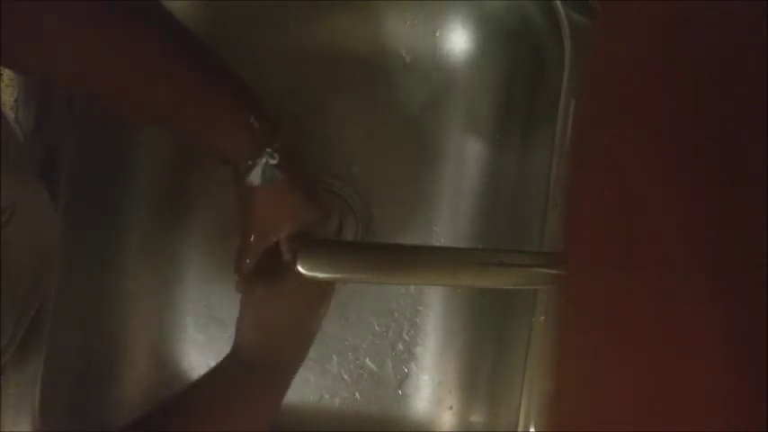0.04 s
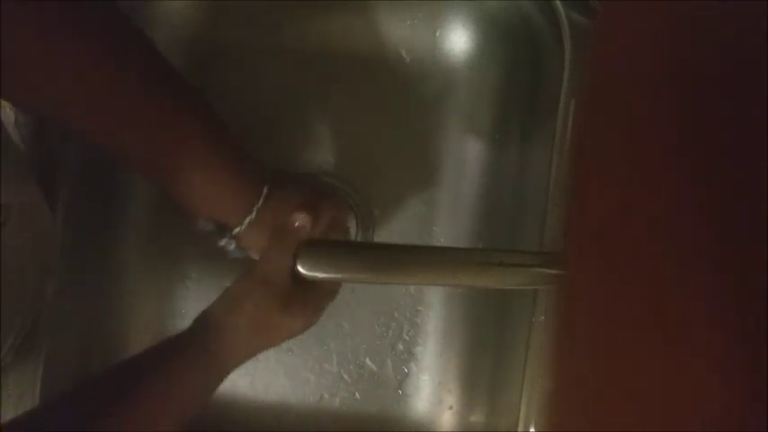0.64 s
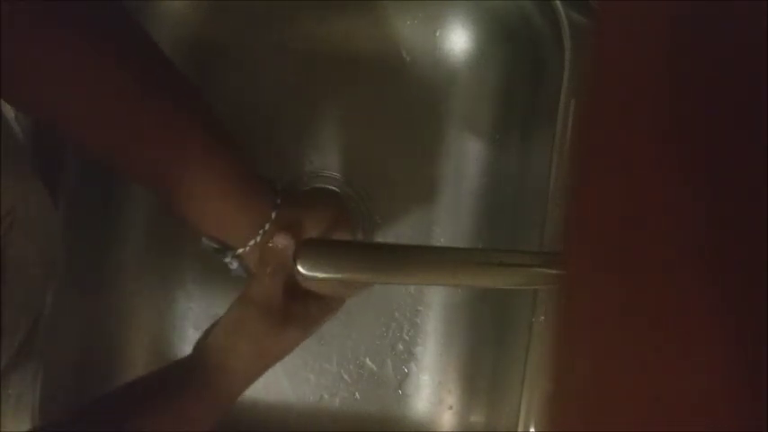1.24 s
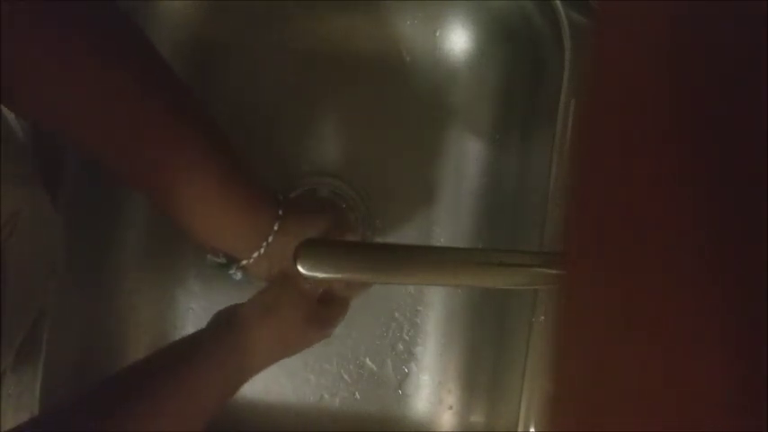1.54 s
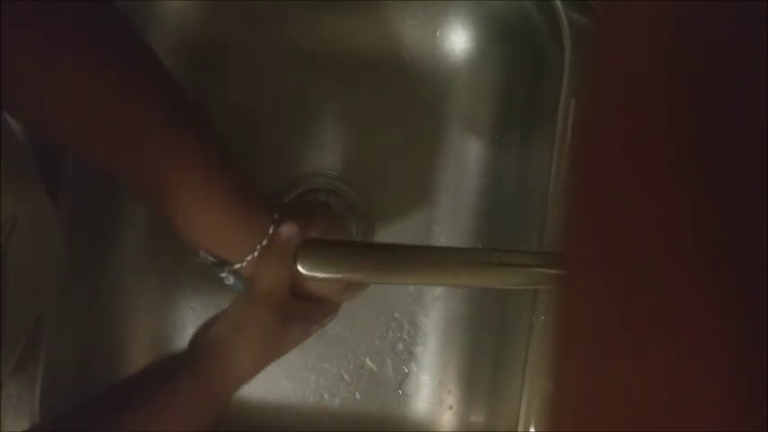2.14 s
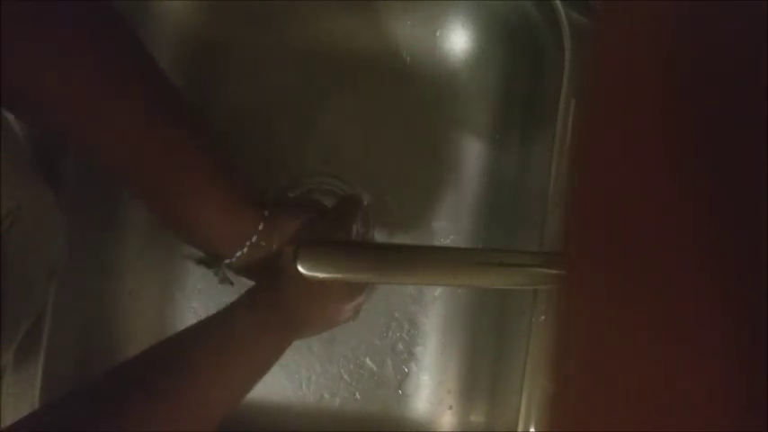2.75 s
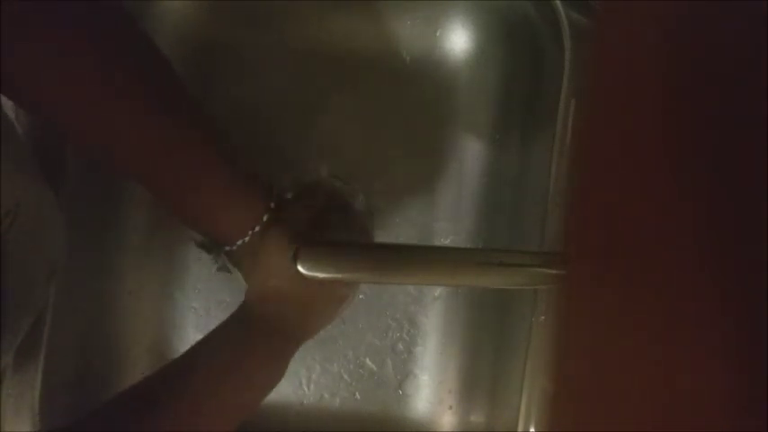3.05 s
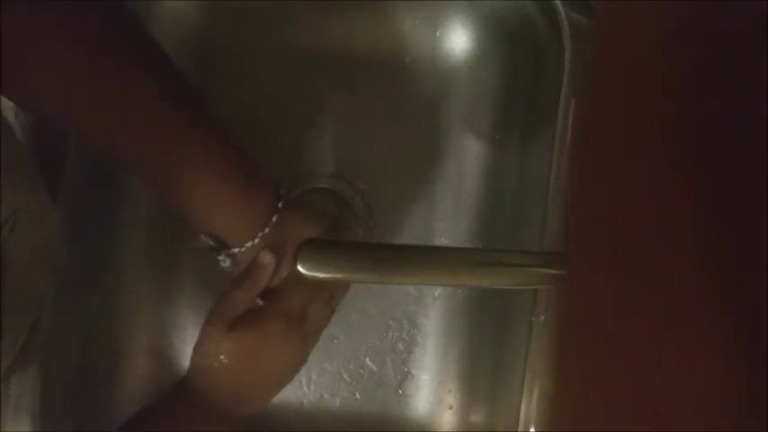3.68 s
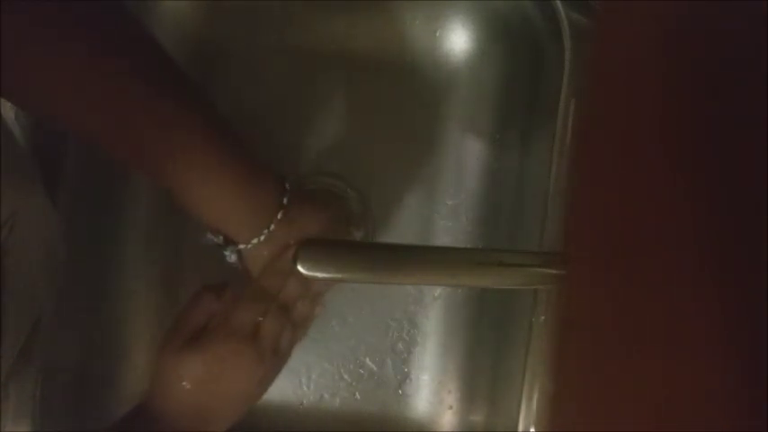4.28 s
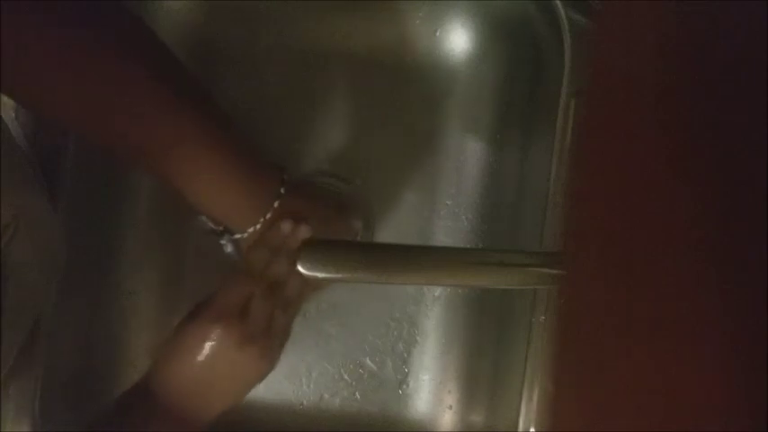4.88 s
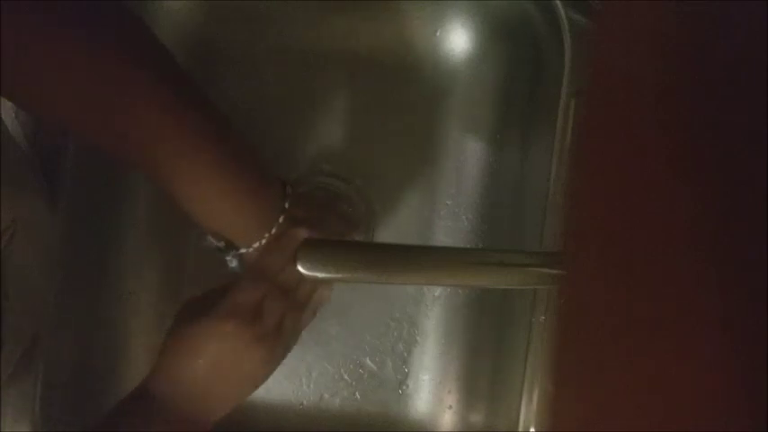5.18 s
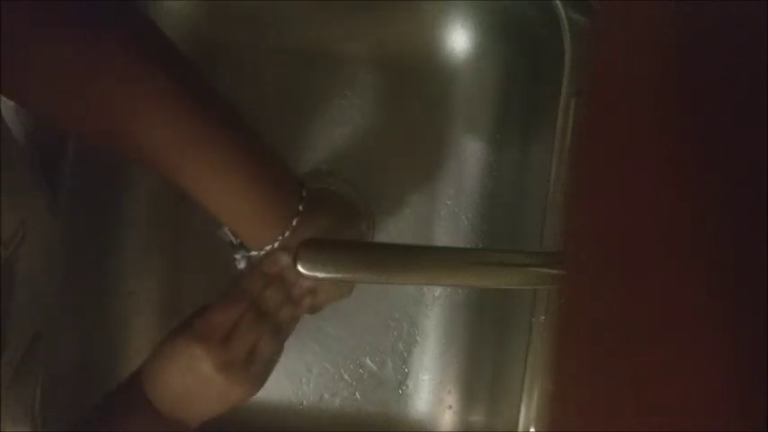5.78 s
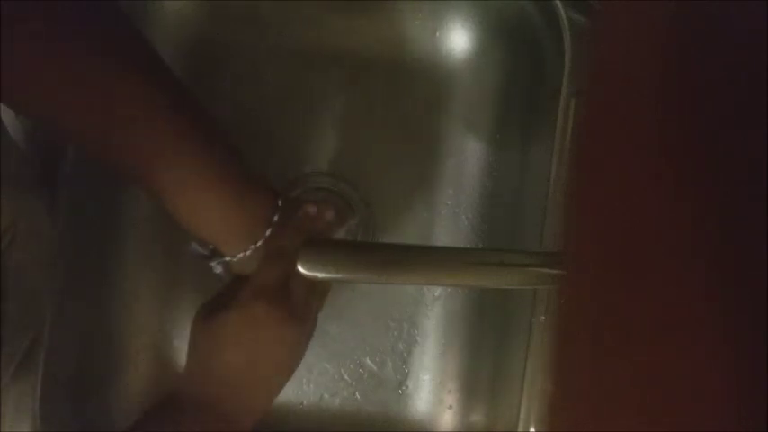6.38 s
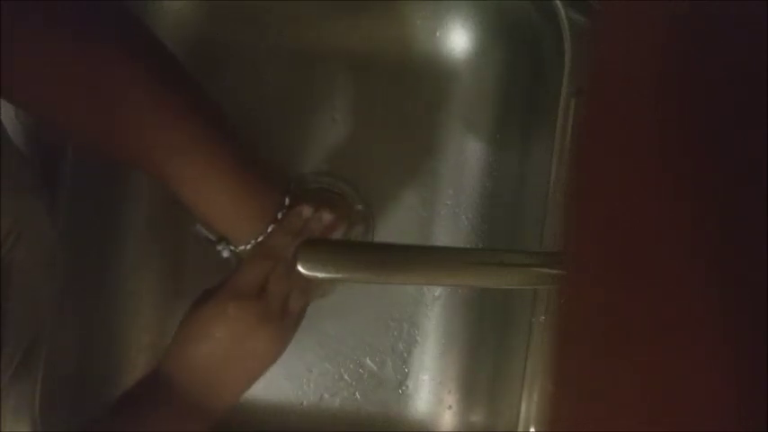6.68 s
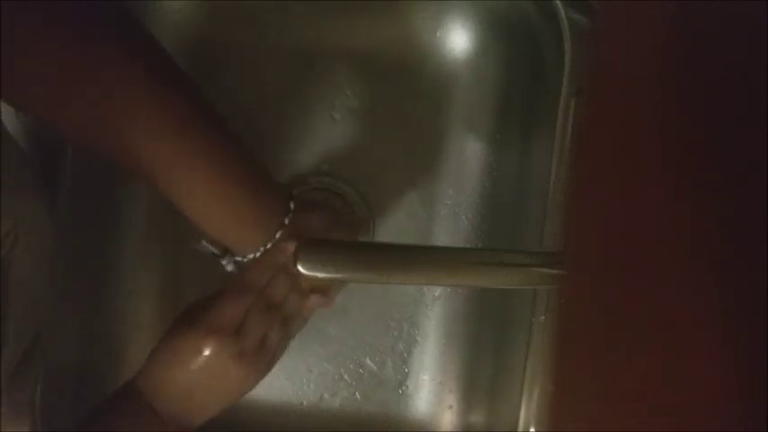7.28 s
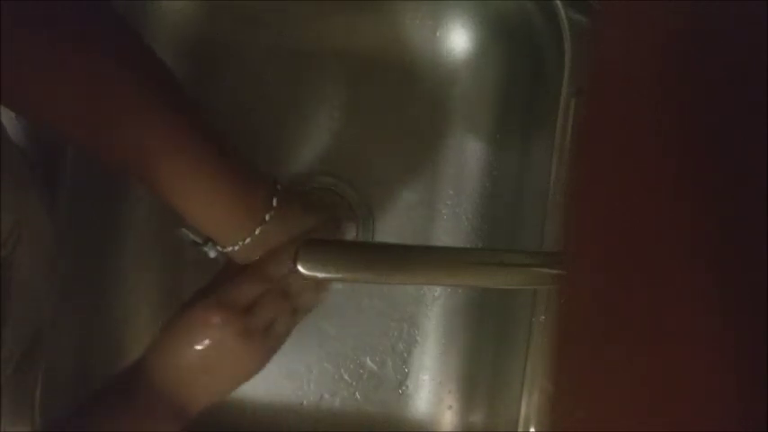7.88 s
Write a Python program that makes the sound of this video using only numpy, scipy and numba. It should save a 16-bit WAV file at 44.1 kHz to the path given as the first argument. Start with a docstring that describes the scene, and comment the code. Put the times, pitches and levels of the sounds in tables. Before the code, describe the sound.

Hands are rubbed and rinsed under a steady stream of tap water, heard close up just above a steel kitchen sink. The water hisses and splashes from start to finish while the palms squish, click and pop unevenly. From about three seconds in, light wet slaps join the rubbing. Heavier slops of water occasionally hit the basin with soft, hollow thuds, over a light gurgle and small pinging drips.

```python
"""Hissing, splashing water, close up: a kitchen faucet runs over two hands into a stainless steel sink.
The jet breaks into tiny bubbles on the skin; the rubbing palms squelch, slap and pop pockets of air.
Below, run-off drums on the sink floor and stray drops ping. The steel walls and the kitchen throw
the splashes back to a pair of microphones just above the basin."""
import sys
import numpy as np
from scipy import signal
from scipy.fft import rfft, irfft
from scipy.io import wavfile
from numba import njit

SR = 44100
rng = np.random.default_rng(int(sys.argv[2]) if len(sys.argv) > 2 else 0)


def to_wav(sig):
    """Store sig (one row per channel, or 1-D mono) as 16-bit WAV at the path in sys.argv[1].

    Samples outside -1..1 are clipped; the rate is SR.
    """
    pcm = np.clip(np.atleast_2d(sig), -1, 1) * 32767
    pcm = np.round(pcm).astype(np.int16)
    wavfile.write(sys.argv[1], SR, pcm.T)  # frames by channels


N = 358533
TIME, FREQ = np.arange(N) / SR, np.arange(N // 2 + 1) * SR / N

# Spectra of the room rumble and of the stream's three voices: (frequency [Hz], relative level [dB])
RUMBLE_SPECTRUM = [(15, 5.5), (35, -20), (70, 4), (150, -9), (400, -21.5), (1000, -38)]
GURGLE_SPECTRUM = [(330, -7.5), (460, -16.5), (570, -7.5), (800, -6.5), (1150, -1.5), (1400, -5.5),
                   (2000, -4)]
HISS_SPECTRUM = [(450, -30), (700, 1), (1500, 1), (2000, 10.5), (4500, 9), (6300, 0.5), (8000, -2),
                 (10000, -6.5), (13000, -6), (16000, -4.5)]
SPLASH_SPECTRUM = [(900, -17), (1450, -17), (1700, -1.5), (2400, -6), (3300, -2), (4100, 1), (5000, -4),
                   (6000, -9), (8000, -17.5), (12000, -20)]
# Resonances of the sink floor, the drain and the basin walls:
# (frequency [Hz], half-width [Hz], relative level [dB], phase lag of the right side [rad])
FLOOR_MODES = [(59, 55, -10.5, -1), (86, 6.3, -3.5, 0.1), (107.5, 13.8, 7, -0.44), (118, 5.1, -15, 0.5),
               (188, 15.1, 0.5, 0.79), (219.6, 7.9, 1, 0.87), (286.6, 29.6, -7.5, 1), (297.4, 7.4, -9, 2.5),
               (324, 13, -7.5, 3.5)]
DRAIN_MODES = [(516.2, 9.9, -2.5, 1.48), (608.6, 29, -8.5, 0.45), (685, 45, -15, 0.45),
               (850, 23, -7.5, 0.87)]
BASIN_MODES = [(1107, 13, 1, 1.25), (1233, 70, 2, 3.08), (1304, 27, -1, 4.2), (1498, 10, 4, 1.66),
               (1665, 47, 5, 2.27), (1773, 87, -7.5, 1.9), (2045, 52, 4, 2.3), (2214, 85, 1, 1.4),
               (2350, 35, 5.5, 1), (2697, 105, 1, 1.23), (3050, 76, 3, 3.34), (3152, 45, 0, 0.62),
               (3876, 120, -1.5, 0.48), (4200, 140, -7.5, 0.75)]
# Run-off landing on the bare steel floor: (time [s], level [dB])
RUNOFF_LEVELS = [(0, -64), (0.55, -64.5), (0.8, -67.5), (1.25, -65.5), (1.8, -66), (2.5, -65), (3.6, -61.5),
                 (3.85, -68), (4.1, -60), (4.45, -67), (4.75, -60.5), (5.35, -65), (5.7, -60.5),
                 (6.3, -64.5), (6.6, -63), (8.13, -62.5)]
# The hands part and water pours onto the drain: (time of peak [s], relative level [dB], length [s])
DRAIN_POURS = [(0.456, -67.5, 0.22), (1.17, -72, .1), (2.166, -67.5, 0.38), (2.884, -60.5, 0.093),
               (3.1, -68.5, 0.52), (4.15, -62.5, 0.28), (5.052, -70, 0.11), (5.9, -60, 0.23),
               (6.486, -67.5, 0.084), (7.948, -72, 0.13)]
# Heavy slops and soft thuds of water on the steel: (time [s], relative level [dB], length [s])
FLOOR_SLOPS = [(0.325, -53, 0.042), (0.46, -54, 0.034), (2.902, -48, 0.071), (3.125, -54, 0.031),
               (4.81, -60, 0.051), (5.07, -71, 0.025), (5.61, -58, .07), (5.79, -53.5, 0.069),
               (5.895, -52.5, 0.078), (7.02, -58, 0.031), (7.67, -60, 0.032), (7.89, -56, 0.073)]
FLOOR_THUDS = [(1.49, -52.5, 0.16), (3.72, -49, 0.074), (4.35, -46, 0.076), (5.33, -49, 0.086),
               (5.9, -49, 0.055), (6.08, -49, 0.067), (6.28, -50, 0.054), (6.5, -50, 0.081),
               (6.98, -49, 0.14)]
# Water squeezed out between the palms: (time [s], relative level [dB], pitch [Hz], length [s])
PALM_SQUELCHES = [(0.294, -49.5, 1950, 0.048), (0.329, -49, 4000, 0.052), (0.402, -48, 3230, 0.032),
                  (0.43, -49, 3260, 0.034), (0.502, -39, 4120, 0.023), (0.528, -40, 3800, 0.026),
                  (0.566, -41, 4400, 0.013), (0.586, -41, 3110, .033), (1.069, -46, 4400, 0.032),
                  (1.09, -56, 1156, 0.051), (1.325, -49.5, 4770, 0.04), (1.803, -46, 4020, 0.02),
                  (2.094, -50, 3480, .018), (2.305, -46.5, 3100, 0.024), (2.65, -41, 4300, 0.0082),
                  (2.661, -44.5, 2830, 0.021), (2.855, -45.5, 3170, .03), (2.919, -45, 2470, 0.023),
                  (3.002, -42.5, 4800, 0.025), (3.155, -45, 4140, 0.03), (3.387, -41.5, 4400, .01),
                  (3.453, -44.5, 3040, 0.031), (3.727, -40, 2070, 0.02), (3.73, -37, 4420, .015),
                  (3.784, -45, 2450, 0.017), (3.935, -42, 4000, .02), (3.938, -46, 2520, 0.029),
                  (4.018, -49.5, 6600, 0.026), (4.284, -40, 3730, 0.024), (4.454, -58, 1100, 0.041),
                  (4.632, -48, 2000, 0.031), (5.227, -43, 4020, 0.027), (5.332, -43, 4100, 0.026),
                  (5.696, -42, 3150, 0.031), (5.871, -46, 6340, 0.015), (5.899, -49, 1910, 0.018),
                  (5.995, -48, 4370, 0.03), (6.056, -46, 2090, .016), (6.109, -45, 5800, 0.016),
                  (6.256, -47, 3750, 0.034), (6.311, -46, 4820, 0.033), (6.438, -48, 7400, 0.014),
                  (6.742, -46, 2150, 0.017), (7.048, -45, 5200, 0.0081), (7.102, -52, 2800, 0.013),
                  (7.197, -42, 4180, 0.016), (7.289, -39.5, 2240, 0.0068), (7.315, -42.5, 2780, 0.019),
                  (7.68, -50, 3130, 0.02), (7.726, -49, 1770, 0.018), (7.72, -44, 2900, .014),
                  (8.079, -46, 5200, 0.022)]
# Wet palms clapping shut: (time [s], relative level [dB], middle pitch [Hz], length [s])
PALM_SLAPS = [(2.91, -41.5, 4700, 0.017), (3.602, -43.5, 3130, 0.031), (3.728, -38.5, 4440, .011),
              (4.165, -45, 2670, 0.013), (4.273, -44, 5200, .006), (4.287, -51, 3500, 0.013),
              (5.357, -44.5, 3000, 0.013), (5.689, -41, 3800, 0.018), (6.052, -40.5, 3330, .013),
              (6.324, -47, 3160, 0.033), (6.382, -38, 3330, 0.01), (6.449, -46, 3600, .006),
              (7.067, -38, 3450, .012), (7.294, -37, 3900, 0.0098), (7.795, -45, 2930, 0.0075)]
# Air pockets bursting between the fingers; a short ring is a tick, a long one a plip:
# (time [s], relative level [dB], pitch [Hz], ring [cycles])
FINGER_POPS = [(0.5215, -27, 4100, 4.3), (0.589, -29, 3060, 9), (0.607, -32, 2890, 7.6),
               (1.072, -34, 3900, 11), (1.092, -37, 3900, 12), (1.118, -33, 3760, 12),
               (1.1425, -31, 3860, 8.5), (1.2523, -32, 2220, 5.7), (1.7355, -34, 4340, 6),
               (1.789, -32, 3875, 11), (1.846, -34, 3920, 9), (1.889, -32, 4100, 5), (1.964, -35, 3900, 7),
               (1.999, -38, 2660, 8.8), (2.044, -36, 2660, 7.3), (2.087, -32, 3770, 12),
               (2.093, -31.5, 2710, 8), (2.279, -33, 3790, 8), (2.452, -25, 3900, 6.6),
               (2.6398, -31, 4300, 3), (2.9438, -29, 2185, 6.5), (2.9788, -20, 4090, 3.8),
               (3.4362, -26.5, 4320, 2.1), (4.0268, -29, 4070, 6.6), (4.17, -30.5, 3820, 5.4),
               (4.2747, -26, 3980, 5), (4.2882, -25, 3300, 6.7), (4.519, -33, 4640, 7),
               (4.562, -29, 3910, 5.5), (4.6224, -29.5, 2070, 4.4), (4.638, -30, 4500, 4),
               (4.7535, -29, 3800, 6), (4.8422, -28.5, 3830, 6), (5.001, -30, 3750, 9.3),
               (5.223, -30.5, 3790, 6), (5.349, -22, 3700, 8.7), (5.434, -38, 3900, 5),
               (5.662, -27, 3460, 4.5), (5.9592, -21.5, 4150, 7.7), (6.033, -33, 4770, 5),
               (6.0754, -24.5, 4530, 5), (6.1115, -22.5, 5900, 3), (6.343, -29, 4670, 3),
               (6.4277, -25, 5560, 3), (7.141, -26, 3930, 6), (7.181, -28, 4900, 3.5),
               (7.293, -26.5, 4000, 6.5), (7.571, -34.5, 2690, 5.5), (7.592, -30, 4200, 6),
               (7.695, -34, 3240, 5), (7.722, -37, 1615, 6), (7.7977, -28, 3660, 6.4),
               (8.027, -30, 5030, 3.1)]
# Water gulping in the cupped palms: (time [s], level [dB], length [s], pitch of the hollow [Hz])
PALM_GULPS = [(1.057, -57, 0.035, 1120), (1.887, -59, 0.11, 1300), (2.279, -56, 0.033, 1300),
              (3.208, -50, 0.053, 780), (3.404, -55, 0.045, 1000), (4.05, -60, .03, 900),
              (4.434, -58, 0.064, 1100), (4.673, -57, 0.029, 1000), (5.045, -57, 0.04, 950),
              (5.422, -55, .025, 1000), (6.64, -65, .025, 1000), (6.803, -53.5, 0.042, 1200),
              (7.006, -59, 0.039, 1100), (7.413, -62, 0.032, 1200), (7.68, -53, 0.04, 1000),
              (7.718, -60, .028, 1100), (8.0, -56, 0.05, 1440), (8.071, -60, 0.024, 1110)]
# Sheets of fine spray flicked off the fingers: (time [s], level [dB], length [s], pitch [Hz])
FINGER_SPRAYS = [(.258, -57, 0.02, 5800), (.712, -54, .02, 5500), (1.88, -52, .02, 6000),
                 (2.148, -49, 0.016, 5900), (2.468, -55, .02, 8000), (2.637, -49, .012, 7500),
                 (3.945, -55, 0.05, 6500), (5.228, -56, 0.02, 5500), (5.342, -60, .02, 12000),
                 (5.517, -60, 0.018, 8000), (5.868, -57, .022, 9500), (6.19, -52, 0.023, 5600),
                 (6.29, -56, 0.046, 8500), (6.435, -58, .025, 7800), (7.195, -56, .045, 8500),
                 (7.625, -56, .018, 7500), (7.724, -50, .018, 5800)]
# How hard the jet breaks on the turning hands: (time [s], relative level [dB])
JET_LEVELS = [(0.0, -48.5), (0.22, -44), (0.47, -42.5), (0.68, -44), (1.27, -46), (1.99, -45), (2.53, -46),
              (2.87, -44), (3.19, -47.5), (3.82, -45.5), (6.29, -46.5), (6.43, -44.5), (6.77, -46.5),
              (7.15, -42.5), (7.4, -46), (8.13, -49.5)]
# Balance between the two microphones: (frequency [Hz], left minus right [dB])
MIC_BALANCE = [(100, 0), (270, -3), (520, 6.5), (700, 0.5), (860, 0.5), (1200, -0.5), (1650, 4.5),
               (2000, -0.5), (2300, 2.5), (2900, 1.5), (3800, 1.5), (5000, 7.5), (5800, 1.5), (8000, 5),
               (14000, 2.5)]


def undb(db):
    """Decibels to gain."""
    return 10 ** (np.asarray(db) / 20)


def unit(x):
    """Scale to rms 1."""
    return x / np.sqrt(np.mean(x ** 2))


def response(points):
    """Gain at every frequency from (frequency [Hz], level [dB]) points."""
    hz, db = np.transpose(points)
    return undb(np.interp(np.log(FREQ + 1), np.log(hz), db))


def colour(x, points):
    """Shape a sound's spectrum, at rms 1."""
    return unit(irfft(rfft(x) * response(points), N))


def drift(per_s):
    """Smooth random drift, spread near 1."""
    knots = rng.standard_normal(N // 100)
    return np.interp(TIME * per_s, np.arange(len(knots)), knots)


def resonate(modes, drive):
    """Water drives each mode, which reaches the two microphones in different phase; rms 1."""
    out = 0
    for hz, width, db, phase in modes:
        ring = 1 / (1 + 1j * (FREQ - hz) / width) ** 2
        out = out + undb(db) * ring * np.exp(-1j * np.array([[0], [phase]]))
    return unit(irfft(out * rfft(drive), N))


def tail(t60, delay_s):
    """Diffuse decaying echo of unit energy, unrelated left and right."""
    t = TIME[:SR // 2]
    echo = rng.standard_normal((2, len(t))) * np.exp(-np.log(1000) * t / t60) * (t > delay_s)
    return echo / np.sqrt(np.sum(echo ** 2, axis=1, keepdims=True))


def echoes(x, basin_db=-6, basin_t60=0.13, room_db=-11, room_t60=0.14):
    """Add reflections from the near steel walls, then the kitchen; moving hands shift their pattern."""
    out, turn = x, 2 * drift(per_s=4)
    for share in (np.cos(turn), np.sin(turn)):
        walls = undb(basin_db) * tail(basin_t60, 0.0024) + undb(room_db) * tail(room_t60, 0.0073)
        out = out + share * signal.fftconvolve(x, walls, axes=1)[:, :N]
    return out


@njit
def bubbles(start, hz, cycles, size, lag, glide, onset):
    """Each bubble swells, rises in pitch and dies by 1/e in its cycles; lag [s] delays the right side."""
    out = np.zeros((2, N))
    for k in range(len(start)):
        life = cycles[k] * SR / hz[k]
        left, right = int(start[k] * SR), int((start[k] + lag[k]) * SR)
        ring, turn = size[k] + 0j, np.exp(2j * np.pi * hz[k] / SR - 1 / life)
        rise = np.exp(2j * np.pi * hz[k] / SR * glide / life)
        shut, opening = 1., np.exp(-1 / (onset * life))
        for i in range(int(6 * life)):
            ring, turn, shut = ring * turn, turn * rise, shut * opening
            if min(left, right) + i >= 0 and max(left, right) + i < N:
                sample = ring.imag * (1 - shut) ** 2
                out[0, left + i] += sample
                out[1, right + i] += sample
    return out


def froth(count, low_hz, high_hz, cycles, spread_db):
    """Bubbles all over the basin, a few much louder than the rest; even power per Hz."""
    when, pitch, ring, big, place = rng.random((count, 5)).T
    hz = low_hz * (high_hz / low_hz) ** pitch
    size = undb(-spread_db * np.log(big + 0.038)) * hz
    lag = (2 * place - 1) * .002
    return bubbles(when * N / SR, hz, cycles * (.5 + ring), size, lag, glide=0.031, onset=0.14)


def pouring():
    """Strength of the pours: each swells and ebbs evenly."""
    return sum(undb(db) * np.exp(-2 * ((TIME - s) / length) ** 2) for s, db, length in DRAIN_POURS)


def surges(table, t=TIME):
    """Strength of sudden masses of water: each rises fast, peaks at half its length and trails off."""
    out = 0
    for start, db, length, *_ in table:
        age = np.maximum(t - start, 0) / (length / 2)
        out = out + undb(db) * age ** 2 * np.exp(2 * (1 - age))
    return out


def bursts(water, table, octaves):
    """Short surges of a water sound, each gathered around its own pitch."""
    out = np.zeros((2, N))
    for start, db, length, hz in table:
        span = slice(int(start * SR), int((start + 3 * length) * SR))
        n = len(TIME[span])
        octaves_off = np.log2((np.arange(n // 2 + 1) * SR / n + 1) / hz)
        peak = 1 / (1 + (octaves_off / octaves) ** 2) ** 2
        band = unit(irfft(rfft(water[:, span]) * peak, n))
        out[:, span] += band * surges([(start, db, length)], TIME[span])
    return out


def mix_in(out, run, start, length, db):
    """Add a run of bubbles with the energy of a steady sound of this length and level."""
    span = slice(int(start * SR), int((start + 2 * length + .02) * SR))
    out[:, span] += run[:, span] * undb(db) * np.sqrt(2 * length * SR / np.sum(run[:, span] ** 2))


def room_tone():
    """Faint low rumble of the kitchen, nearly the same at both microphones."""
    noise = rng.standard_normal(N) + 0.28 * rng.standard_normal((2, N))
    return undb(-65.5) * colour(noise, RUMBLE_SPECTRUM)


def sink(boom_db=-61, drain_db=-71):
    """Run-off drums on the floor and rings the drain; pours swell both, slops and thuds the floor."""
    pour, runoff_db = pouring(), np.interp(TIME, *np.transpose(RUNOFF_LEVELS))
    change_db = runoff_db - runoff_db.mean()
    thuds, slops = undb(-6) * surges(FLOOR_THUDS), undb(-1.5) * surges(FLOOR_SLOPS)
    landing = np.sqrt(undb(runoff_db) ** 2 + (undb(-0.5) * pour) ** 2 + slops ** 2)
    turbulence = rng.standard_normal((3, N))
    boom = resonate(FLOOR_MODES[:4], turbulence[0]) * np.hypot(undb(boom_db + 0.39 * change_db), thuds)
    drum = resonate(FLOOR_MODES[4:], turbulence[1]) * landing
    drain = resonate(DRAIN_MODES, turbulence[2]) * np.hypot(undb(drain_db + change_db), undb(2) * pour)
    return boom + drum + drain


def strays(hz, count, scatter, cycles, spread_db):
    """Separate drops and bubbles at random moments, each ringing briefly at its own pitch; rms 1."""
    when, big, ring, place = rng.random((count, 4)).T
    pitch = hz * np.exp(scatter * rng.standard_normal(count))
    size = undb(-spread_db * np.log(big + 0.081))
    lag = (place - .5) * .6 / pitch
    drops = bubbles(when * N / SR, pitch, cycles * (.5 + ring), size, lag, glide=0.0042, onset=0.13)
    return unit(echoes(drops))


def pings():
    """Drops ping near one pitch on the steel, among run-off bubbles that plink over a wide range."""
    steel = strays(hz=3935, count=330, scatter=0.049, cycles=12, spread_db=4.5)
    plinks = strays(hz=3016, count=800, scatter=0.271, cycles=8.4, spread_db=3.0)
    return steel * undb(-59.5 - 5 * drift(per_s=6.8)) + plinks * undb(-58)


def spatter(start, hz, size, count, spread, cycles, scatter_s):
    """Each burst flings droplets: a shower of very short ticks over a wide range of pitch."""
    early, pitch, place = rng.random((len(start), count, 3)).transpose(2, 0, 1)
    when = start[:, None] - scatter_s * np.log(early + 1e-6)
    tick_hz = np.minimum(hz[:, None] * np.exp(spread * (2 * pitch - .8)), SR / 3)
    sizes = size[:, None] * early / np.sqrt(count)
    lag = (place - .5) / hz[:, None]
    return bubbles(when.ravel(), tick_hz.ravel(), np.full(when.size, cycles), sizes.ravel(),
                   lag.ravel(), glide=0.014, onset=0.083)


def squelches(count=22, scatter=0.098, cycles=5, climb=0.12):
    """A squeeze spits droplets and frees a run of bubbles, climbing in pitch as the gap closes."""
    starts, levels, pitches, _ = np.transpose(PALM_SQUELCHES)
    out = spatter(starts, pitches, undb(levels), count=60, spread=0.4, cycles=1.8, scatter_s=0.007)
    for start, db, hz, length in PALM_SQUELCHES:
        age = (np.arange(count) + rng.random(count)) / count
        pitch = hz * np.exp(scatter * rng.standard_normal(count) + climb * (age - .5))
        size = np.exp(-1.2 * age) * rng.uniform(0.34, 1, count)
        lag = rng.uniform(-0.00019, 0.00022, count)
        run = bubbles(start + length * age, pitch, np.full(count, cycles), size, lag, 0.023, 0.12)
        mix_in(out, run, start, length, db - 1)
    return out


def slaps(count=36, scatter=0.224, cycles=3.2, fade_db=9):
    """Palms clap shut and flick out water: a tight volley of ticks, hardest at first contact."""
    out = np.zeros((2, N))
    for start, db, hz, length in PALM_SLAPS:
        age = (np.arange(count) + rng.random(count)) / count
        pitch = np.minimum(hz * np.exp(scatter * rng.standard_normal(count)), SR / 3)
        size = undb(-fade_db * age) * rng.uniform(0.15, 1, count)
        lag = (rng.random(count) - .5) * 0.71 / pitch
        volley = bubbles(start + length * age, pitch, np.full(count, cycles), size, lag, 0.029, 0.13)
        mix_in(out, volley, start, length, db)
    return out


def pops():
    """Every pocket of air that bursts rings as one larger bubble, with a wet tick."""
    start, db, hz, cycles = np.transpose(FINGER_POPS).copy()
    lag = rng.uniform(-.15, .15, len(start)) / hz
    ring = bubbles(start, hz, cycles, undb(db + 6), lag, glide=0.0063, onset=0.38)
    return ring + spatter(start, hz, undb(db + 3.5), count=30, spread=0.556, cycles=2.36, scatter_s=0.004)


def soften(x, cutoff_hz=7900):
    """Soft wet skin dulls the top of the treble."""
    return irfft(rfft(x) / np.sqrt(1 + (FREQ / cutoff_hz) ** 6), N)


def hands(left_lead_db=2.0):
    """Hands a little left of centre; pops burst in the open, drier than the sounds between the palms."""
    popping = echoes(soften(pops()), basin_db=-6, basin_t60=0.07, room_db=-9, room_t60=0.24)
    palms = soften(squelches() + slaps())
    rubbing = echoes(palms, basin_db=-3.5, basin_t60=0.084, room_db=-4.5, room_t60=0.2)
    return (popping + rubbing) * undb(np.array([[left_lead_db], [-left_lead_db]]) / 2)


def gurgle():
    """Low bubbles trickle along, swell with each pour and gulp in the hollow of the palms."""
    water = froth(count=9000, low_hz=353.4, high_hz=1910, cycles=10.65, spread_db=2.0)
    water = colour(echoes(water), GURGLE_SPECTRUM)
    trickle = undb(-58 + 3 * drift(per_s=12))
    gulps = bursts(water[::-1], PALM_GULPS, octaves=1.2)
    return water * np.hypot(trickle, undb(2.5) * pouring()) + gulps


def spray(change_db, follow=0.45):
    """Fine mist partly follows the force of the splash, and the fingers flick off sheets of it."""
    mist = froth(count=20000, low_hz=5270, high_hz=14600, cycles=2.6, spread_db=4.0)
    fizz = colour(echoes(mist), [(4000, 3.5), (7000, -7.5), (10000, -4.5), (15000, -12)])
    level_db = -60 + follow * change_db + 0.4 * drift(per_s=20)
    return fizz * undb(level_db) + bursts(mist[::-1], FINGER_SPRAYS, octaves=0.3)


def hiss():
    """The aerated jet gives a broad, flickering hiss."""
    return colour(rng.standard_normal((2, N)), HISS_SPECTRUM) * undb(-47 + 1.8 * drift(per_s=24))


def rippling(x, depth_db=1):
    """Swarms of like-sized bubbles come and go: five bands half an octave apart swell separately."""
    centres = np.log(1500 * np.sqrt(2) ** np.arange(5))
    out, spectrum = 0, rfft(x)
    for weights in np.eye(len(centres)):
        band = irfft(spectrum * np.interp(np.log(FREQ + 1), centres, weights), N)
        out = out + band * undb(depth_db * drift(per_s=17))
    return unit(out)


def splash():
    """The jet breaks into tiny bubbles on the skin, and they ring the basin; rms 1."""
    drops = froth(count=20000, low_hz=997.5, high_hz=8970, cycles=8.3, spread_db=3.5)
    return rippling(colour(echoes(drops), SPLASH_SPECTRUM) + undb(-3.5) * resonate(BASIN_MODES, drops[0]))


def stream(gulp_lift_db=1.5):
    """The jet on the hands: splash, spray and pings follow its force and lift briefly at each gulp."""
    gulp = surges(PALM_GULPS)
    flow_db = np.interp(TIME, *np.transpose(JET_LEVELS)) + gulp_lift_db * gulp / gulp.max()
    change_db = flow_db - flow_db.mean()
    splash_db = flow_db - 0.74 + drift(per_s=22)
    return hiss() + spray(change_db) + splash() * undb(splash_db) + gurgle() + pings() * undb(change_db)


def scene():
    """Hands and stream up close, the sink floor below them, the kitchen behind."""
    return hands() + stream() + sink() + room_tone()


def record(dry, top_hz=15850):
    """Two microphones above the sink face different ways, the left brighter; the top is cut steeply."""
    left = np.sqrt(response(MIC_BALANCE))
    heard = irfft(rfft(dry) * np.array([left, 1 / left]), N)
    return signal.sosfilt(signal.ellip(12, .1, 70, top_hz, fs=SR, output="sos"), heard)


dry = scene()
out = record(dry)
to_wav(out)
```